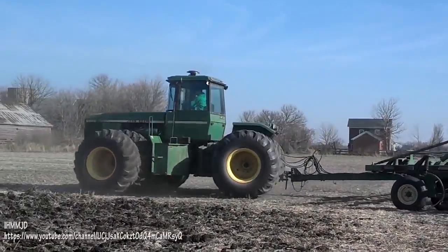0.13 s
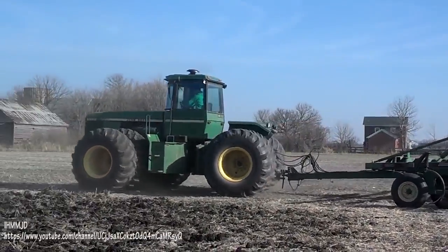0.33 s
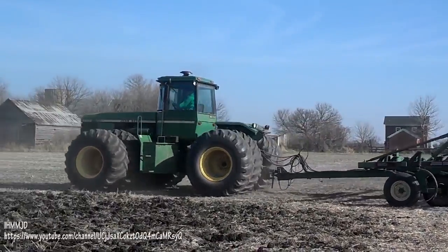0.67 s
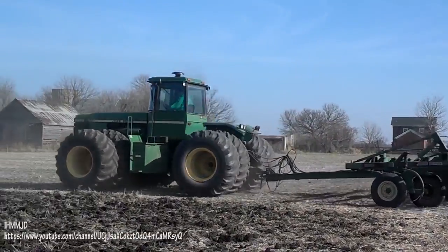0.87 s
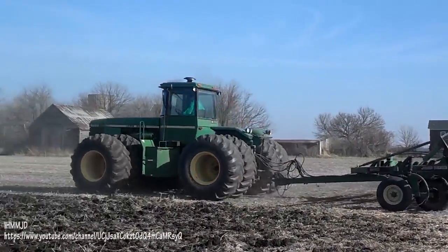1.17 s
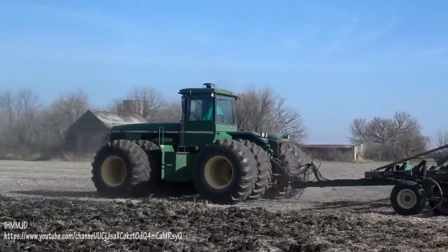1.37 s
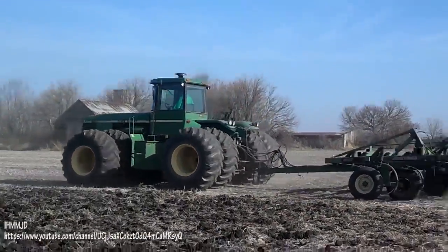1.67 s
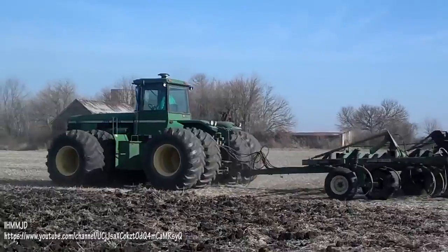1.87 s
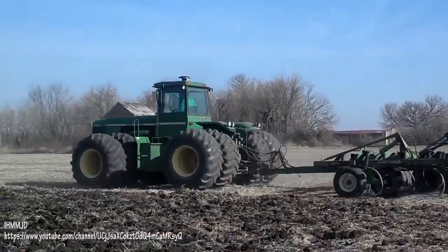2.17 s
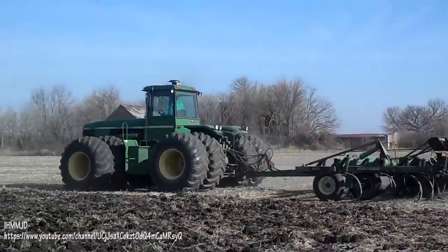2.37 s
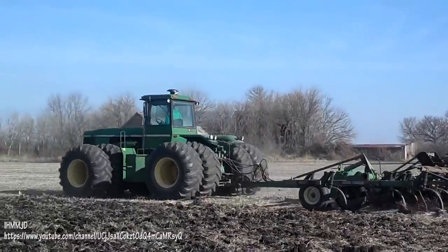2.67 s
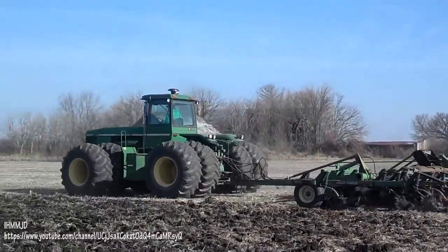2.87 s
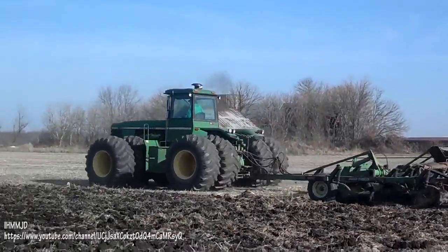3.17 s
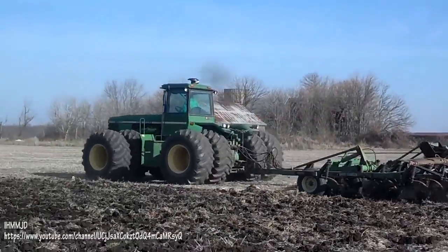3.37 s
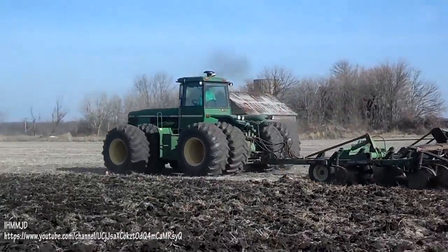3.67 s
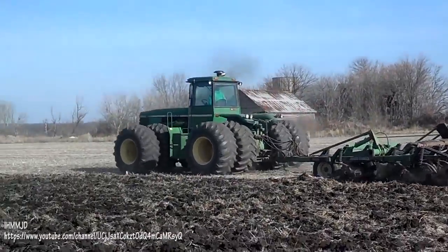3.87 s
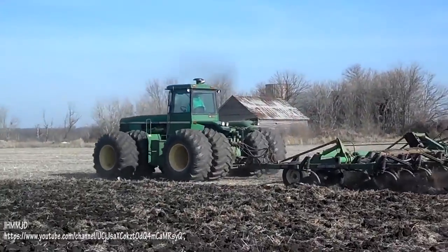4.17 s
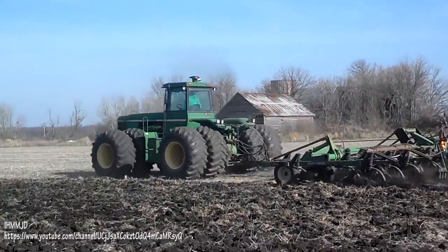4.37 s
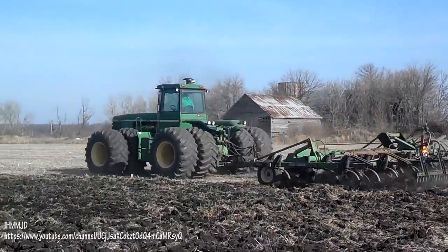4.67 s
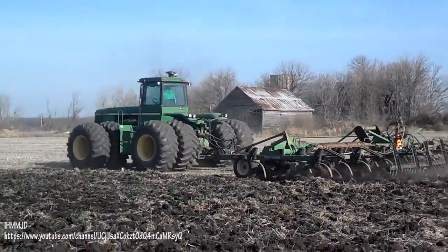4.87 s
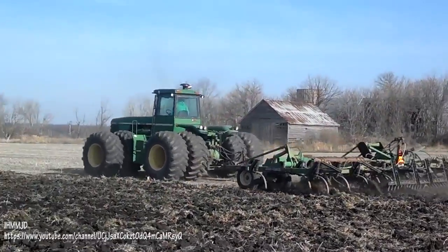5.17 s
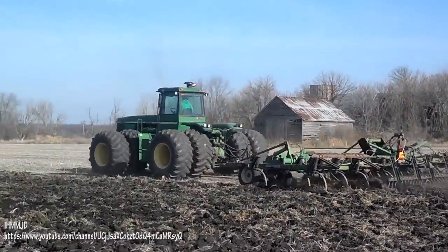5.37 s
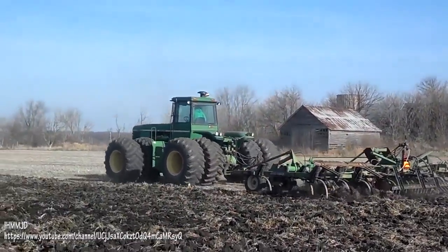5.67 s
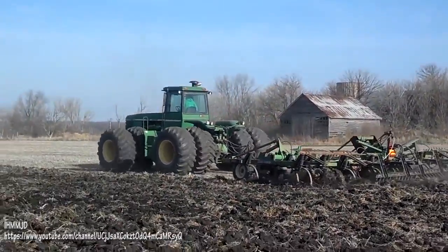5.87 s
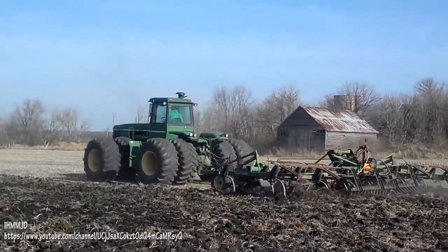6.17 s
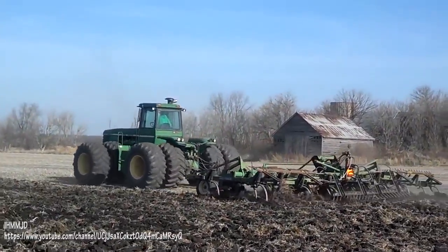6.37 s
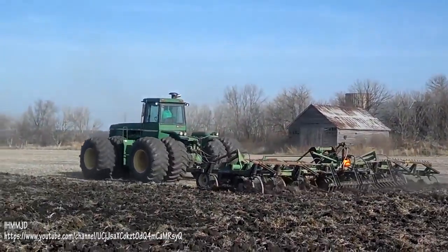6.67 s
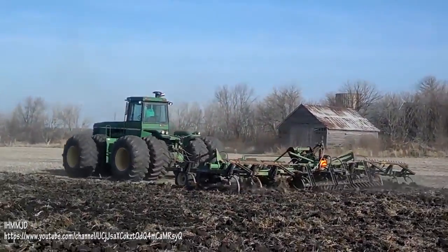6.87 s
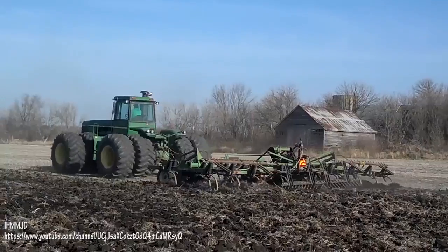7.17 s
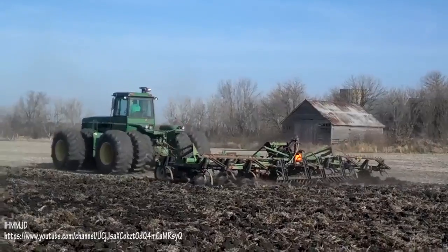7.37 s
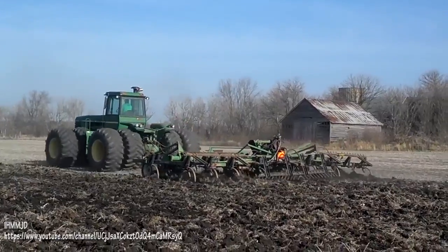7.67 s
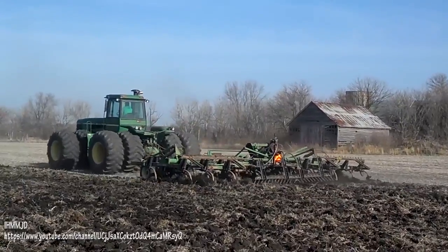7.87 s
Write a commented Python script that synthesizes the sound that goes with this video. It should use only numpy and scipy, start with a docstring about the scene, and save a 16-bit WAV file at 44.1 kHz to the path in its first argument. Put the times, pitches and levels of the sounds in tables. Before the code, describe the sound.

Out on a field, the rough drone of a heavy diesel tractor runs throughout, with light gear whine and a faint turbo whistle. The towed implement rattles briefly, then its discs and bearings chirp and squeal as they bite into dry, softly hissing soil. The engine dips in pitch and partly recovers as it turns away. Wind buffets the microphone, and the tractor's level drops after the stronger gusts.

```python
"""A big diesel tractor turns away across an open field, dragging a tillage implement.
Its uneven firing drones as a harmonic series over combustion noise, while panels, turbo and gears
sound narrow bands. Dry soil hisses, impacts ring the implement's frame, and its discs and bearings
squeal by stick-slip friction. Turbulent gusts thump on two microphone ports, which a delayed
subtraction matrixes to stereo."""
import sys
import numpy as np
from scipy import signal
from scipy.io import wavfile
from scipy.ndimage import uniform_filter1d

SR = 44100
rng = np.random.default_rng(int(sys.argv[2]) if len(sys.argv) > 2 else 0)


def to_wav(sig):
    """Store sig (one row per channel, or 1-D mono) as 16-bit WAV at the path in sys.argv[1].

    Samples outside -1..1 are clipped; the rate is SR.
    """
    pcm = np.clip(np.atleast_2d(sig), -1, 1) * 32767
    pcm = np.round(pcm).astype(np.int16)
    wavfile.write(sys.argv[1], SR, pcm.T)  # frames by channels


N = 353726


def from_db(db):
    """Decibels to amplitude ratio."""
    return 10 ** (np.asarray(db) / 20)


def rms_one(x):
    """Normalisation to unit rms."""
    return x / np.sqrt(np.mean(x ** 2) + 1e-20)


def in_time(rows):
    """Linear interpolation of each column, one value a sample."""
    s, *columns = np.transpose(rows)
    return [np.interp(np.arange(N) / SR, s, c) for c in columns]


def at_hz(rows, hz):
    """Interpolation of each column on a logarithmic frequency axis."""
    f, *columns = np.transpose(rows)
    return [np.interp(np.log(hz), np.log(f), c) for c in columns]


def drift(rate_hz):
    """Random modulation: low-passed noise of unit rms."""
    pole = np.exp(-80 * np.pi * rate_hz / SR)
    white = rng.standard_normal(N // 40 + 2002)   # one value every 40 samples
    slow = signal.lfilter([1], [1, -2 * pole, pole * pole], white)[2000:]
    return np.interp(np.arange(N) / 40, np.arange(len(slow)), rms_one(slow))


def delay(x, samples):
    """Pure delay by whole samples."""
    return np.concatenate([np.zeros(samples), x[:N - samples]])


def narrowband(hz, level_db, width_hz):
    """Quadrature modulation: two slow noises spread a carrier into a narrow band."""
    phase = 2 * np.pi * np.cumsum(hz) / SR
    return from_db(level_db) * (drift(width_hz) * np.sin(phase) + drift(width_hz) * np.cos(phase))


# Likeness of the noise at the two ports. Each row: frequency in Hz, correlation from 0 to 1.
COHERENCE = [(200, .99), (1200, 0.64), (2200, 1), (3500, 0), (6000, 1), (8000, 1), (16000, .02)]

def band_noise(gain_db_at, low_hz, flicker_db):
    """Partial coherence: each third octave reaches the ports as in-phase plus antiphase noise."""
    out, white = np.zeros((2, N)), rng.standard_normal((2, 2, N))
    edges = low_hz * 2 ** np.arange(0, np.log2(18000 / low_hz), 1 / 3)
    shared_drift = drift(24)
    for k, (low, high) in enumerate(zip(edges, edges[1:])):
        bandpass = signal.butter(2, [low, high], "band", fs=SR, output="sos")
        common, opposed = signal.sosfilt(bandpass, white[k % 2])
        hz = np.sqrt(low * high)
        alike = np.clip(at_hz(COHERENCE, hz)[0], 0, 1)
        gain = from_db(gain_db_at(hz) + flicker_db * (0.7 * shared_drift + 0.72 * drift(13.5)))
        out += gain * (np.sqrt(1 + alike) * common + np.sqrt(1 - alike) * opposed * [[1], [-1]])
    return out / np.sqrt(SR)


# Exhaust harmonics, from the fourth up. Each row: relative level in dB side on, then tail on.
EXHAUST_ORDERS = [(-44.5, -66.5), (-41, -40.5), (-32.5, -32), (-36.5, -29.5), (-40, -26), (-39.5, -49.5),
                  (-38, -51), (-41, -46), (-58, -43.5), (-33.5, -46), (-38, -55.5), (-46.5, -68.5),
                  (-46.5, -47.5), (-47, -70), (-54, -47), (-61, -46.5), (-55, -55.5), (-53.5, -56),
                  (-56, -53.5), (-63.5, -58), (-60.5, -49.5), (-57, -62), (-59.5, -63), (-57, -66.5),
                  (-51, -54.5), (-66, -54.5), (-54, -48.5)]

def exhaust(cycle, tail_on):
    """Harmonic series: uneven firing puts a wavering tone on multiples of the engine's cycle rate."""
    out = np.zeros(N)
    for order, (side_db, tail_db) in enumerate(EXHAUST_ORDERS, 4):
        level_db = side_db + (tail_db - side_db) * tail_on + 1.8 * drift(2.5)
        phase = 2 * np.pi * (order * cycle + rng.random()) + 0.25 * drift(3)
        out += from_db(level_db) * np.sin(phase)
    return np.sqrt(2) * out


# Engine and fan noise. Each row: frequency in Hz, relative level in dB side on, then tail on.
CLATTER_SPECTRUM = [(50, 4.5, 2.5), (110, 9, 17), (190, 14.5, 12), (288, 8, -1.5), (493, 3, 5.5),
                    (774, -9, 5), (972, 4, -0.6), (1370, -6.5, -1.5), (1950, 5.5, 3), (2350, -1, -4),
                    (3550, -9.5, -6), (4500, -14, -9.5), (6500, -27.5, -21.5)]

def clatter(cycle, tail_on):
    """Amplitude modulation: combustion and fan noise swell at each firing, some cylinders harder."""
    def spectrum_db(hz):
        side_db, tail_db = at_hz(CLATTER_SPECTRUM, hz)
        return side_db + (tail_db - side_db) * tail_on
    firing_db = 0.8 * np.cos(2 * np.pi * 8 * cycle) + 0.68 * np.cos(2 * np.pi * 3 * cycle)
    return from_db(firing_db) * band_noise(spectrum_db, low_hz=40, flicker_db=0.45)


# Transmission whine. Each row: time in seconds, high mesh frequency in Hz, its relative level in dB,
# low mesh frequency in Hz, its relative level in dB.
GEAR_MESH = [(0, 4180, -45, 1890, -24), (2.7, 4150, -38, 1810, -32), (2.9, 4110, -25, 1817, -5.5),
             (3.1, 4260, -16, 1720, -20), (3.6, 4010, -17, 1690, -22), (4.4, 4048, -11, 1816, -15.5),
             (4.9, 4150, -12, 1807, -10.5), (6.05, 4120, -13, 1771, -19.5), (7.3, 4085, -12, 1770, -22.5),
             (8.02, 4080, -19, 1790, -15.5)]

def gears():
    """Periodic tooth contact: two gear meshes whine, each at its own frequency."""
    high_hz, high_db, low_hz, low_db = in_time(GEAR_MESH)
    return narrowband(high_hz, high_db, width_hz=10.5) + narrowband(low_hz, low_db, width_hz=12)


# Turbo whistle. Each row: time in seconds, frequency in Hz, relative level in dB.
TURBO_WHISTLE = [(0, 10250, -30), (2.5, 10250, -33), (2.9, 11000, -40), (3.3, 12200, -35),
                 (3.9, 14000, -33), (4.4, 14200, -34), (5.6, 12900, -32), (6.2, 12780, -30),
                 (7, 13050, -33), (8.02, 13300, -35)]

def turbo():
    """Rotor tone: the turbo whistles in a narrow band that glides in pitch."""
    return narrowband(*in_time(TURBO_WHISTLE), width_hz=130)


# Panel ringing. Each row: time in seconds, frequency in Hz, relative level in dB.
PANEL_RING = [(0, 1400, -17), (1.6, 1455, -8.5), (2.3, 1430, -10.5), (3, 1350, -15), (3.4, 1350, -34),
              (8.02, 1350, -30)]

def panels():
    """Damped resonance: the engine's side panels ring in a broad peak."""
    return narrowband(*in_time(PANEL_RING), width_hz=152)


# Soil hiss. Each row: frequency in Hz, relative level in dB.
SOIL_SPECTRUM = [(1500, -12.5), (3000, -3.5), (4500, 3.5), (6000, 10), (7500, -1), (11000, 0.5),
                 (16000, -16)]

def soil():
    """Friction noise: tyres and tines hiss unevenly through dry soil."""
    return band_noise(lambda hz: at_hz(SOIL_SPECTRUM, hz)[0], low_hz=1416, flicker_db=2.7)


# Gusts on the ports. Each row: centre in seconds, nominal rms level in dB, half-length in seconds.
WIND_GUSTS = [(0.238, -21, 0.045), (0.77, -31.5, 0.043), (0.82, -31.0, 0.065), (1.62, -29, 0.03),
              (3.343, -41, 0.041), (3.913, -39, 0.061), (3.931, -28.5, 0.021), (3.97, -29, 0.029),
              (4.016, -21.5, 0.02), (4.08, -15, 0.038), (4.186, -26.5, 0.1), (4.242, -27, 0.017),
              (4.29, -27.5, 0.052), (4.467, -31.0, 0.018), (4.755, -36, 0.044), (5.055, -20, 0.044),
              (5.104, -26, 0.031), (5.153, -22.5, 0.044), (5.349, -23, 0.02), (5.406, -34.0, 0.042),
              (5.599, -28, 0.034), (6.025, -37, 0.052), (6.186, -22.5, 0.032), (6.606, -22.5, 0.052),
              (6.695, -27, 0.033), (6.754, -28.0, 0.031), (6.786, -44, 0.064), (6.89, -25, 0.031),
              (6.988, -25, 0.079), (7.201, -24, 0.026), (7.25, -32, 0.058), (7.296, -29, 0.04),
              (7.41, -16.5, 0.027), (7.473, -27, 0.029), (7.629, -34, 0.016), (7.706, -29, 0.077),
              (7.895, -40, 0.032), (7.993, -19.5, 0.034)]

def wind(breeze_db=-41.5, low_hz=27.01, dull_hz=238, edge_hz=600):
    """Turbulent pressure: lumpy low noise, independent at each port and brighter in strong gusts."""
    t, strength = np.arange(N) / SR, np.full(N, from_db(breeze_db))
    for centre, level_db, half in WIND_GUSTS:
        span = slice(int((centre - 2 * half) * SR), int((centre + 2 * half) * SR))
        strength[span] += from_db(level_db) * np.exp(-3 * ((t[span] - centre) / half) ** 2)
    highpass = signal.butter(1, low_hz, "high", fs=SR, output="sos")
    noise = signal.sosfilt(highpass, rng.standard_normal((2, N)))
    dull = rms_one(signal.sosfilt(signal.butter(3, dull_hz, fs=SR, output="sos"), noise))
    edge = rms_one(signal.sosfilt(signal.butter(3, edge_hz, fs=SR, output="sos"), noise))
    air = dull + 4 * strength * edge
    steady_air = air / np.sqrt(uniform_filter1d(air ** 2, 900))   # a gust pushes steadily
    return strength * steady_air * from_db(0.74 * drift(33))


# Knocks of hitch and frame. Each row: start in seconds, relative level in dB.
KNOCKS = [(0.2024, -20), (0.614, -27.5), (1.6302, -26), (1.8307, -21), (1.9305, -11.5), (2.0502, -20),
          (2.1186, -19), (2.377, -44), (2.4239, -18), (2.4428, -26), (2.4733, -14)]
# Modes of the frame. Each row: frequency in Hz, relative level in dB.
FRAME_MODES = [(2400, -1), (2950, 3), (3600, 4), (4350, 4.8), (4900, -3), (5500, -10), (6300, -8.5)]

def clanks(contacts=8, rattle_s=0.024, t60_s=0.029):
    """Impact excitation: each knock is a short rattle of contacts that rings the frame's modes."""
    out = np.zeros(N)
    starts, knock_db = np.transpose(KNOCKS)
    lag_s = np.sort(rng.random((len(starts), contacts)), axis=1) * rattle_s
    lag_s[:, 0] = 0
    hits = ((starts[:, None] + lag_s) * SR).astype(int)
    radius = from_db(-60 / (t60_s * SR))
    for hz, mode_db in FRAME_MODES:
        scatter_db = rng.normal(0, 3.6, hits.shape)
        impulses = np.full(N, 1e-18)
        impulses[hits] = from_db(knock_db[:, None] + mode_db - 16.5 + scatter_db - 100 * lag_s)
        w = 2 * np.pi * hz / SR
        out += signal.lfilter([0, np.sin(w)], [1, -2 * radius * np.cos(w), radius ** 2], impulses)
    return out


# Squeals. Each row: start in seconds, length in seconds, frequency in Hz, relative level in dB.
BEARING_SQUEALS = [(1.929, 0.045, 4730, -39), (1.932, 0.03, 5560, -46), (2.69, 0.05, 5150, -48),
                   (2.7, 0.029, 4400, -40), (2.701, 0.03, 8790, -56), (2.754, 0.064, 4240, -39),
                   (2.84, 0.045, 5430, -46), (2.847, 0.061, 932, -47.5), (2.867, 0.017, 4430, -36),
                   (2.923, 0.1, 4570, -34), (2.926, 0.028, 9170, -43), (2.96, 0.044, 5480, -48),
                   (2.978, 0.02, 4530, -33), (2.995, 0.035, 8900, -53), (3.017, 0.026, 4140, -30),
                   (3.04, 0.027, 8250, -52), (3.049, 0.058, 9010, -41), (3.146, 0.075, 6220, -52.5),
                   (3.182, 0.035, 4070, -37), (3.189, 0.027, 11840, -50), (3.249, 0.028, 12000, -54),
                   (3.27, 0.11, 5090, -26.5), (3.411, 0.035, 3930, -31.5), (3.41, 0.027, 7800, -50),
                   (3.413, 0.054, 5050, -46), (3.699, 0.044, 3880, -36), (3.812, 0.061, 3910, -37),
                   (3.81, 0.076, 7880, -52), (3.877, 0.013, 4100, -36), (4.12, 0.044, 4800, -44),
                   (4.157, 0.065, 4350, -34), (4.172, 0.023, 5400, -45), (4.248, 0.025, 5760, -48),
                   (4.269, 0.1, 4140, -37), (4.328, 0.083, 5420, -51), (4.567, 0.067, 4040, -45),
                   (4.765, 0.047, 4420, -41), (4.772, 0.024, 9000, -59), (4.929, 0.039, 4380, -49),
                   (5.024, 0.039, 5430, -53), (5.041, 0.033, 4550, -41.5), (6.21, 0.022, 5530, -47),
                   (6.67, 0.035, 5400, -51), (6.906, 0.025, 5260, -46), (6.96, 0.06, 3450, -38),
                   (7.068, 0.078, 4833, -49), (7.101, 0.055, 8800, -57), (7.29, 0.023, 5480, -46),
                   (7.734, 0.039, 5450, -55), (7.88, 0.061, 5060, -57)]

def squeals():
    """Stick-slip oscillation: dry bearings and discs sound tones that swell, tremble and die."""
    out, t = np.zeros(N), np.arange(N) / SR
    waver = np.cumsum(24 * drift(90)) / SR
    flicker = from_db(3.5 * drift(80))
    for start, length, hz, level_db in BEARING_SQUEALS:
        span = slice(int(start * SR), int((start + length + 0.08) * SR))
        age = t[span] - start
        attack = np.clip(age / (0.13 * length), 0, 1)
        release = from_db(-700 * np.maximum(age - 0.82 * length, 0))
        phase = 2 * np.pi * (hz * age + waver[span])
        overtones = from_db(-29) * np.sin(2 * phase) + from_db(-36.5) * np.sin(3 * phase)
        tone = np.sin(phase) + (hz < 5300) * overtones
        out[span] += from_db(level_db + 12.5) * attack * release * flicker[span] * tone
    return out


# Faint squeaks of the many discs. Each entry: frequency in Hz.
DISC_PITCHES = [3480, 3970, 4180, 4550, 4960, 5600, 7000, 7400, 9050]

def creaks():
    """Intermittent slip: once the discs bite, each squeaks briefly now and then."""
    biting_db, = in_time([(0, -23), (2.4, -15), (2.8, 0.3), (8.02, 2.5)])
    out = np.zeros(N)
    for hz in DISC_PITCHES:
        slips_db = 16 * np.clip(drift(8.4), -3, 2.2) - 5.4 * hz / 1000
        out += narrowband(np.full(N, hz), biting_db + slips_db - 23, width_hz=51)
    return out


def port_cavity(x, hz=1800, q=1.046, treble_db=-8.5):
    """Cavity resonance: the recessed right port hears the tractor later and weaker in the treble."""
    w = 2 * np.pi * hz
    lows = signal.lfilter(*signal.bilinear([w * w], [1, w / q, w * w], SR), x)
    highs = signal.sosfilt(signal.butter(2, hz, "high", fs=SR, output="sos"), x)
    return delay(lows - from_db(treble_db) * highs, samples=1)


# Engine speed. Each row: time in seconds, four-stroke cycles per second.
CYCLE_RATE = [(0, 18.45), (1, 18.5), (2, 18.45), (2.85, 18.2), (3.1, 17.5), (3.35, 17.1), (3.95, 17.1),
              (4.15, 17.5), (4.5, 17.85), (5.3, 17.95), (6, 17.97), (6.9, 17.9), (7.4, 17.75), (8.02, 17.9)]
# The tractor's level, which dips after strong gusts and creeps back.
# Each row: time in seconds, gain in dB, further relative gain of the soil hiss in dB.
TRACTOR_LEVEL = [(0, -22.5, -20), (1.1, -23.5, -16), (1.7, -21.5, -19), (2.1, -24, -15), (2.6, -22.5, -19),
                 (3.05, -23.5, -16), (3.15, -24.5, -13), (3.29, -26, -10), (3.36, -31.5, -16),
                 (3.8, -27, -13), (3.95, -24, -10), (4.08, -30.5, -11), (4.11, -34.5, -16),
                 (4.35, -35, -11), (5.0, -31, -15), (5.1, -34, -10), (5.54, -29, -22), (5.6, -28.5, -10),
                 (6.05, -22.5, -18), (6.6, -27, -13), (7.0, -26, -14), (7.405, -26, -12),
                 (7.42, -35.5, -13), (8.02, -30, -19)]
# The turn away. Each row: time in seconds, heading from 0 (side on) to 1 (tail on).
TRACTOR_HEADING = [(0, 0.011), (2.6, 0.18), (3.3, 0.62), (4, 0.74), (4.6, 0.67), (8.02, 1)]

def scene():
    """Superposition: the pressures of tractor, implement and wind add at the left and right ports."""
    cycle = np.cumsum(in_time(CYCLE_RATE)[0]) / SR
    level_db, hiss_db = in_time(TRACTOR_LEVEL)
    tail_on, = in_time(TRACTOR_HEADING)
    tones = from_db(28) * exhaust(cycle, tail_on) + gears() + turbo() + panels()
    engine = from_db(44.5) * clatter(cycle, tail_on)
    hiss = from_db(hiss_db + 39) * soil()
    left, right = from_db(level_db) * (tones + engine + hiss + creaks()) + squeals() + clanks()
    return np.array([left, port_cavity(right)]) + wind()


def record(dry):
    """Differential array: each channel is one port minus the other delayed, then band-limited."""
    left, right = dry
    stereo = np.array([left - delay(right, samples=16), right - delay(left, samples=16)])
    low_cut = signal.butter(2, 95, "high", fs=SR, output="sos")
    top_cut = signal.ellip(12, 0.5, 80, 15700, fs=SR, output="sos")
    return signal.sosfilt(top_cut, signal.sosfilt(low_cut, stereo))


dry = scene()
out = record(dry)
to_wav(out)
```